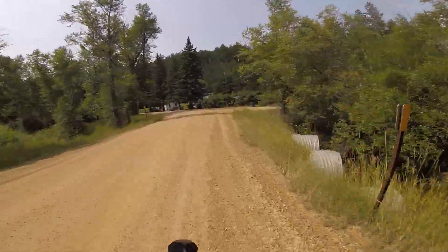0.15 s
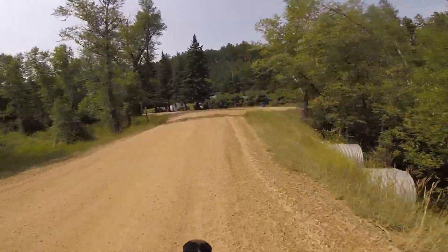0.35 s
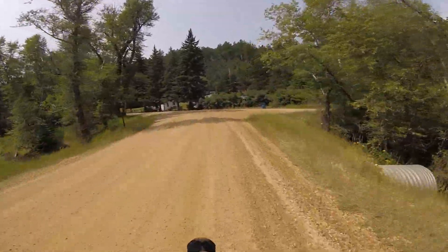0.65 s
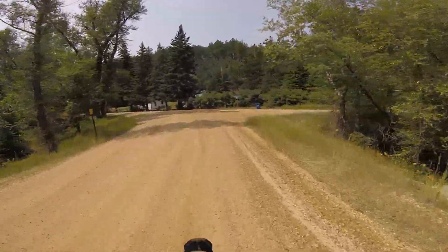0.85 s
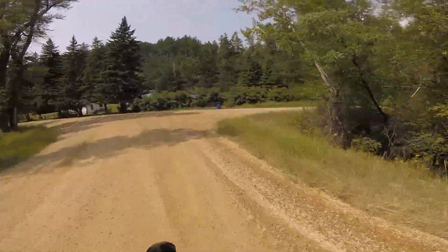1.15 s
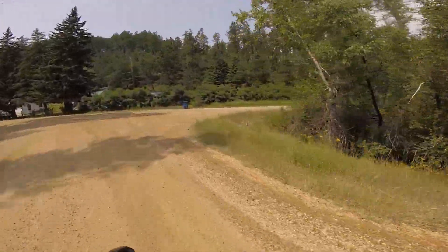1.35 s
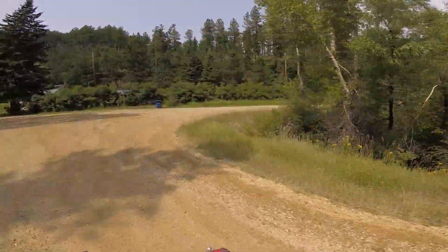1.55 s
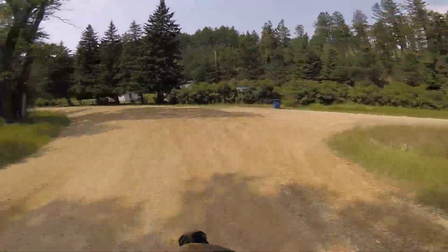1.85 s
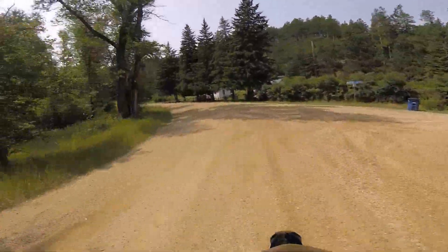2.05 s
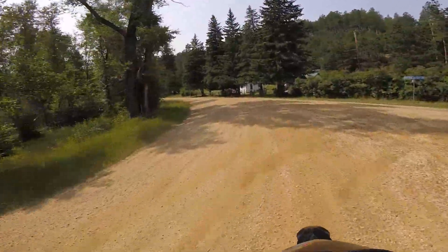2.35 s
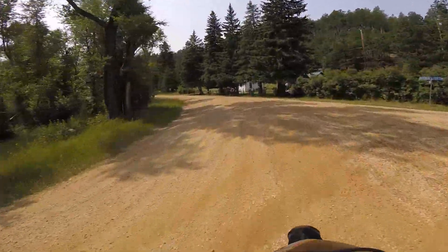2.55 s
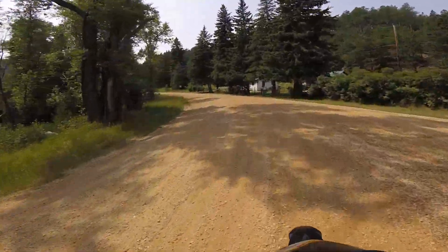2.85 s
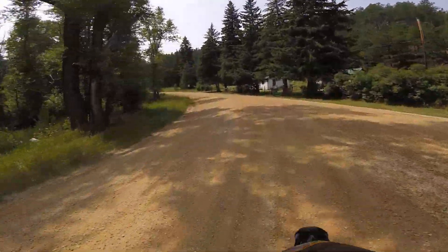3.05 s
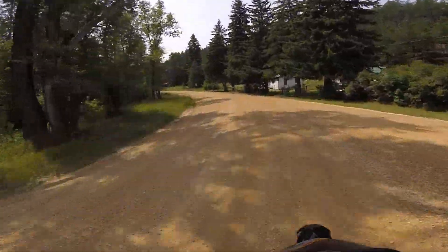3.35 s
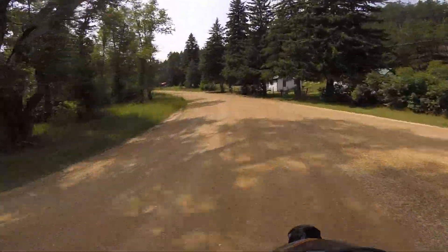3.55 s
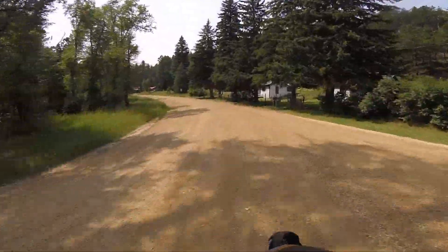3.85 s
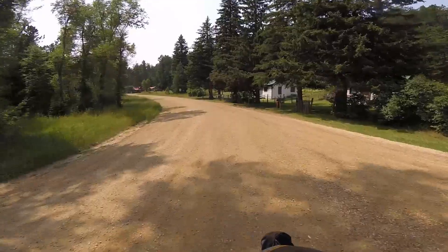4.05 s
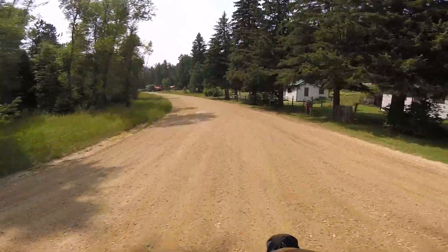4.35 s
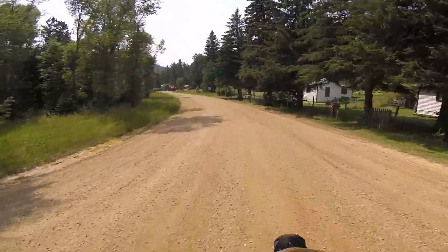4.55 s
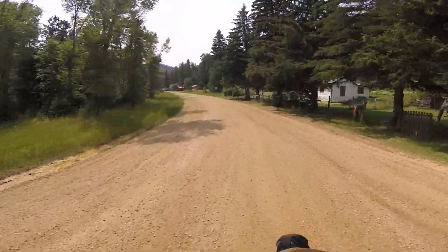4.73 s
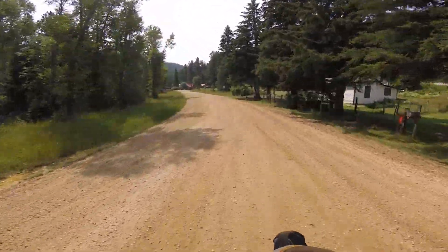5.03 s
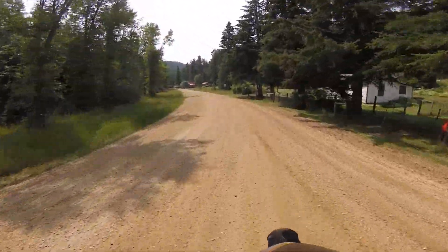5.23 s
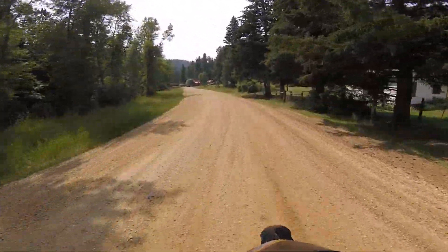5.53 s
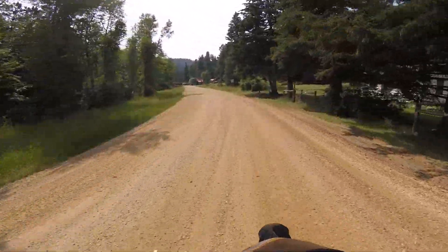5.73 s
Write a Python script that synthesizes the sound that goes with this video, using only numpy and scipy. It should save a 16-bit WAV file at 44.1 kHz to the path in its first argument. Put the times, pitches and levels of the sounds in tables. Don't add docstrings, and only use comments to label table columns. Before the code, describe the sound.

A single-cylinder motorcycle lurches and clatters, coasts sputtering into a gravel bend, then settles into a steady, low thudding pull away.

```python
import sys
import numpy as np
from scipy import signal
from scipy.fft import rfft, irfft, next_fast_len
from scipy.io import wavfile
from scipy.ndimage import uniform_filter1d, minimum_filter1d, map_coordinates

SR = 44100
rng = np.random.default_rng(int(sys.argv[2]) if len(sys.argv) > 2 else 0)


def transcribe(u):
    v = np.clip(np.atleast_2d(u).T, -1, 1)
    q = np.round(v * 32767).astype(np.int16)
    wavfile.write(sys.argv[1], SR, q)


def invert_db(level):
    return 10 ** (np.asarray(level, dtype=float) / 20)


N = 259742


def unit(x):
    return x / np.sqrt(np.mean(x ** 2) + 1e-20)


def curves(rows, s):
    t, *columns = np.transpose(rows)
    return [np.interp(s, t, column) for column in columns]


def clock():
    return np.arange(N) / SR


def wobble(rate):
    knots = rng.standard_normal(int(N * rate / SR) + 4)
    return map_coordinates(knots, [np.arange(N) * rate / SR])


def coloured(x, spectrum):
    size = next_fast_len(N + 8192)
    hz, db = np.transpose(spectrum)
    gain = invert_db(np.interp(np.log(np.fft.rfftfreq(size, 1 / SR) + 1), np.log(hz), db))
    return unit(irfft(rfft(x, size) * gain, size)[:N])


def coloured_noise(spectrum):
    return coloured(rng.standard_normal(N), spectrum)


def ringing(starts, sizes, modes, rise, scatter_db, detune, warm=1):
    lead, length = SR // 10, SR // 6
    t = np.arange(length) / SR
    rows = np.zeros((len(starts), length))
    for hz, db, fade_s, polarity in modes:
        chance = rng.standard_normal((len(starts), 2))
        pitch = hz * np.reshape(warm, (-1, 1)) * (1 + detune * chance[:, :1])
        level = invert_db(db + scatter_db * chance[:, 1:] - 60 * t / fade_s)
        rows += np.sign(polarity) * level * np.sin(2 * np.pi * pitch * t)
    soft_start = 1 - np.exp(-t / rise)
    soft_end = np.cos(np.pi / 2 * t / t[-1]) ** .5
    rows *= sizes[:, None] * soft_start * soft_end
    at = np.round(starts * SR).astype(int)[:, None] + lead + np.arange(length)
    return np.bincount(at.ravel(), rows.ravel(), N + SR)[lead:lead + N]


# time_s, rate_hz (firings per second)
ENGINE_SPEED = [(0.0, 28.349), (0.12, 24.125), (0.26, 24.709), (0.38, 17.397), (0.54, 30.748),
                (0.75, 30.837), (1.13, 29.66), (1.38, 28.482), (1.98, 26.511), (2.13, 27.092),
                (2.35, 25.916), (2.68, 25.271), (2.98, 25.822), (3.21, 25.136), (4.24, 26.814),
                (4.51, 26.894), (5.52, 28.336), (5.89, 29.635)]
FIRST_S, CRUISE_HZ = .019, 25.26


def crank():
    turns = np.cumsum(curves(ENGINE_SPEED, clock())[0]) / SR
    return turns - turns[round(FIRST_S * SR)]


# time_s, load_share (0-1), blow_db, unburnt_share (0-1)
THROTTLE = [(0, 1, 7.5, 1), (.2, 0.3, -5, 0.41), (.41, 0.2, -5, 0.14), (.44, 0.8, -7.5, 0.8),
            (.49, 0.7, 1, 0.13), (.53, 0.1, 4, 0.2), (.56, 0.91, 0.5, 1), (.585, 0.11, 0, 0.4),
            (1.1, 0, -2, 0.1), (1.5, 0.17, -4, 0.58), (1.75, 0.15, -3, 0.5), (1.9, 0.3, -5.5, 0.3),
            (2.05, 0.1, -6, 0.4), (2.2, 0.28, -6.5, 0.5), (2.4, 0.9, -5.5, 0.5), (2.6, 0.95, -4.5, 0.19),
            (2.9, 1, -5.5, 0.1), (3.2, 0.68, -3, 0.38), (4, 1, -5.9, 0.06), (5.89, 0.84, -3.5, 0.16)]
# start_s, level_db
MISFIRES = [(-.016, -11), (.135, -7.5), (.175, -5), (.256, -16), (.3, -11), (.348, -6.5), (.398, -9.5),
            (.558, -5), (.754, -13.5), (.885, -3.5), (.917, -8.5), (1.016, -9), (1.151, -5), (1.287, -7.5),
            (1.322, -5.5), (1.428, -9), (1.5, -12), (1.534, -11), (1.253, -3), (1.606, -4), (1.641, -3),
            (1.679, -5), (1.715, -4.5), (1.787, 1), (1.862, -7), (1.9, -0.5), (2.087, 1.5), (2.124, 3),
            (2.389, -2), (2.742, -3), (1.824, -6.5), (1.937, -11), (1.974, -7), (2.012, -6), (2.236, -8),
            (2.274, -6), (2.43, -4.5), (2.506, -4.5)]
# start_s, early_s (negative is late)
STUMBLES = [
    (.398, .007),
    (.451, 0.0073),
    (.214, .003),
    (2.012, .002),
    (2.161, .001),
    (2.35, -.0016),
    (3.093, .0014),
    (3.132, .0005),
    (3.172, -.001),
]
# start_s, early_s
CATCHES = [(1.017, 0.005), (1.288, 0.00054), (1.499, .003), (1.606, 0.01), (1.679, .0025), (1.788, 0.0014),
           (1.862, 0.00043), (1.9, .0036), (2.087, 0.0037), (2.312, 0.00035), (2.389, 0.00058),
           (2.467, 0.0014)]


def firings(turns):
    fired = np.interp(np.arange(turns[-1]), turns, clock())
    fired = np.r_[FIRST_S - 1 / ENGINE_SPEED[0][1], fired]
    for s, early in STUMBLES:
        fired[np.argmin(abs(fired - s))] -= early
    load, blow_db, unburnt = curves(THROTTLE, fired)
    load = np.clip(load, 0, 1)
    hot = load.copy()
    for s, early in CATCHES:
        k = np.argmin(abs(fired - s))
        fired[k], hot[k] = fired[k] - early, .95
    revs = curves(ENGINE_SPEED, fired)[0] - CRUISE_HZ
    ragged_s = .00012 + .0012 * unburnt ** 2
    fired = fired + ragged_s * rng.standard_normal(len(fired))
    burn = np.ones(len(fired))
    for s, db in MISFIRES:
        burn[np.argmin(abs(fired - s))] = invert_db(db)
    return fired, load, hot, invert_db(blow_db) * burn, burn, unburnt, revs


# pitch_hz, level_db, fade_s (to -60 dB), polarity
COAST = [(88.8, -10.5, 0.079, 1), (113.3, -22.5, 0.4, 1), (219, -9, 0.024, -1), (282.4, -9.5, 0.14, 1),
         (437, -27.5, 0.024, 1)]
# pitch_hz, level_db, fade_s, polarity
PULL = [(210, -7, 0.016, 1), (306.4, -10.5, 0.12, -1), (373, -34.5, 0.11, 1)]
# pitch_hz, level_db, fade_s, polarity
TAIL = [(166.6, -13, 0.1, 1)]
# pitch_hz, level_db, fade_s, polarity
HEADER = [(488, -20.5, 0.075, 1), (598, -29, 0.08, 1)]
# pitch_hz, level_db, fade_s, polarity
SNAP = [(196, -21, .03, -1)]
FULL_RING_S = .6


def pipes(fired, hot, blow, revs):
    heating = .0063 * revs
    tail_gain = invert_db(-8 * (fired < FULL_RING_S))
    header_gain = invert_db(.6 * np.maximum(revs, 0))
    pulling = blow * hot
    shut = ringing(fired - .0037, blow * (1 - hot), COAST, rise=.005, scatter_db=1.2, detune=.01,
                   warm=.98 + heating)
    pull = ringing(fired - .0009, pulling, PULL, rise=.0004, scatter_db=.6, detune=.004, warm=1 + heating)
    tail = ringing(fired - .0009, pulling * tail_gain, TAIL, rise=.0004, scatter_db=.6, detune=.004,
                   warm=1 + heating)
    header = ringing(fired - .0019, pulling * header_gain, HEADER, rise=.0006, scatter_db=.6, detune=.003,
                     warm=1 + heating)
    snap = ringing(fired - .002, pulling, SNAP, rise=.0005, scatter_db=.6, detune=.01)
    return shut + pull + tail + header + snap


# pitch_hz, level_db, fade_s, polarity
BOOM = [(88.44, -14.5, 0.18, -1)]
# time_s, level_db, late_s
LABOUR = [(0, -13, .005), (.12, -8.5, .005), (.2, -30.5, .002), (1.95, -30.5, 1.5), (2.05, -21, 0),
          (2.2, -21, .002), (2.3, -8, .0045), (2.5, -14, .005), (2.8, -13.5, .005), (3.05, -23.5, .005),
          (4.2, -20.5, .005), (5.89, -35, .004)]
# pitch_hz, level_db, fade_s, polarity
SURGE = [(79, 0.5, 0.12, 1)]


def silencer_box(fired, load, blow, burn, revs):
    boom_db = 4.5 - 1.5 * np.maximum(revs, 0)
    boom = ringing(fired - .0025, invert_db(boom_db) * blow * load, BOOM, rise=.0025, scatter_db=.9, detune=.012)
    surge_db, late = curves(LABOUR, fired)
    surge_size = invert_db(surge_db) * np.minimum(burn, 1) ** .5
    surge = ringing(fired - .0035 + late, surge_size, SURGE, rise=.012, scatter_db=1.5, detune=.015)
    return boom + surge


# pitch_hz, level_db, fade_s, polarity
AIRBOX = [(50, -26.5, 0.24, -1)]
# pitch_hz, level_db, fade_s, polarity
PLATE = [(187.4, -10, 0.12, 1), (449, -33.5, 0.015, 1)]


def intake(fired, load, revs):
    airbox_size = invert_db(2.5 * np.maximum(revs, 0)) * load ** 1.4
    airbox = ringing(fired - .0025, airbox_size, AIRBOX, rise=.0025, scatter_db=.9, detune=.012)
    half_open = load * (1 - load) * (fired > FULL_RING_S)
    return airbox + ringing(fired - .002, half_open, PLATE, rise=.003, scatter_db=3, detune=.04)


# pitch_hz, level_db, fade_s, polarity
PUFF = [(78.1, -8.5, 0.13, 1), (97, -11, 0.042, 1), (201, -30.5, 0.021, 1), (276, -15.5, 0.044, -1)]


def unburnt_puff(fired, load, hot, burn, unburnt, revs):
    burnt = np.minimum(burn, 1) * (1 - np.clip(unburnt, 0, 1))
    pumped = np.maximum(1 - burnt, hot - load)
    late = .0006 * rng.standard_normal(len(fired))
    puff_db = 2 - 3 * load - 1.3 * np.maximum(revs, 0)
    sag = 1 + .017 * np.minimum(revs, 0)
    return ringing(fired - .0035 + late, invert_db(puff_db) * pumped, PUFF, rise=.0065, scatter_db=.7,
                   detune=.015, warm=sag)


def exhaust(turns):
    fired, load, hot, blow, burn, unburnt, revs = firings(turns)
    gas = pipes(fired, hot, blow, revs) + silencer_box(fired, load, blow, burn, revs)
    gas = gas + intake(fired, load, revs) + unburnt_puff(fired, load, hot, burn, unburnt, revs)
    packing = signal.butter(3, 640, fs=SR, output="sos")
    return signal.sosfilt(packing, gas, zi=signal.sosfilt_zi(packing) * gas[0])[0]


# pitch_hz, level_db
CLATTER = [(250, -49.5), (400, 5), (600, 1), (800, 0), (1050, -0.5), (1500, -11), (2000, -24),
           (2550, -27.5), (3200, -26), (5000, -29.5), (11000, -56)]


def clatter(turns, level_db):
    def swell(share, width):
        return np.exp((np.cos(2 * np.pi * (turns + share)) - 1) / width)

    load = np.clip(curves(THROTTLE, clock())[0], 0, 1)
    gate = .6 + (.25 + .6 * load) * swell(.15, .6) + (.4 - .2 * load) * swell(.72, .3)
    uneven = invert_db(.3 * wobble(30) + .83 * wobble(6.7))
    return invert_db(level_db + 4.5) * unit(uneven * gate * coloured_noise(CLATTER))


# pitch_hz, level_db
PANEL = [(1300, -53), (1495, 1.5), (1515, 0.5), (1535, -1), (1700, -42), (1835, -11), (1852, -0.5),
         (1900, -51.5)]


def panel():
    slack = np.minimum(curves(ENGINE_SPEED, clock())[0] - 29.5, 0)
    shut = np.clip(1 - curves(THROTTLE, clock())[0], 0, 1)
    return invert_db(-55.5 + 2.5 * slack) * shut * coloured_noise(PANEL)


# pitch_hz, level_db
RASP = [(200, -36), (330, 10), (450, 2.5), (680, 0.5), (900, -13), (1500, -57.5)]


def rasp(turns):
    load, _, unburnt = np.clip(curves(THROTTLE, clock()), 0, 1)
    gate = 2.8 + np.exp((np.cos(2 * np.pi * (turns - .15)) - 1) / .5)
    noise = unit(gate * invert_db(1.5 * wobble(25)) * coloured_noise(RASP))
    return invert_db(-37 - 7 * load) * np.sqrt(unburnt) * noise


# pitch_hz, width_hz, level_db, swing_db
FRAME = [
    (1852, 25, -73, 2.5),
    (2520, 120, -67, 1.5),
    (4700, 600, -70, 1.5),
]


def frame():
    total = np.zeros(N)
    for hz, width, db, swing_db in FRAME:
        band = [(hz - 3 * width, -60), (hz - width / 2, 0), (hz + width / 2, 0), (hz + 3 * width, -60)]
        total += invert_db(db + swing_db * wobble(7.4)) * coloured_noise(band)
    return total


# pitch_hz, level_db
HISS = [(500, -20.5), (1000, 7.5), (2000, 2), (3000, -2), (5000, -15), (5700, -19), (7000, -14.5),
        (9800, -32), (10700, -28.5), (11500, -49.5), (14000, -75)]


def tyres(level_db):
    spikes = (rng.random(N) < .01) * invert_db(3 * rng.standard_normal(N)) * rng.choice([-1, 1], N)
    bed = rng.standard_normal(N) * invert_db(.35 * wobble(11) + 2 * wobble(2.6))
    return invert_db(level_db + 7) * coloured(bed + .35 * unit(spikes), HISS)


# time_s, level_db
WIND = [
    (0, -32),
    (.6, -34),
    (1.1, -35),
    (1.5, -32),
    (4.1, -32),
    (4.7, -37),
    (5.89, -39),
]
# pitch_hz, level_db
BUFFET = [(15, -30), (30, -8), (60, 0), (100, -3), (200, -14), (350, -28), (700, -48), (2000, -90)]


def wind():
    level_db, = curves(WIND, clock())
    return invert_db(level_db) * unit(invert_db(1.1 * wobble(16)) * coloured_noise(BUFFET))


def knocks(hits, fade_s, below, above):
    out, t = np.zeros(N + SR), np.arange(SR // 20) / SR
    for s, db, hz in hits:
        burst = invert_db(-60 * t / fade_s) * (1 - np.exp(-t / .001)) * rng.standard_normal(len(t))
        band = signal.butter(3, [below * hz, above * hz], "bandpass", fs=SR, output="sos")
        hit = signal.sosfilt(band, burst)
        out[round(s * SR):][:len(t)] += invert_db(db) * hit / abs(hit).max()
    return out[:N]


# start_s, level_db (peak), pitch_hz
GRIT = [
    (.035, -38, 6500),
    (.084, -42.5, 7000),
    (.17, -48.5, 6000),
    (.275, -45, 4170),
    (.283, -47, 4160),
    (.352, -49.5, 7040),
    (.492, -42, 4530),
    (.5, -45, 7000),
]
# start_s, level_db (peak), pitch_hz
KNOCKS = [(.052, -27.5, 1700), (.168, -28, 1210), (.176, -33, 890), (.415, -33.5, 1210), (.444, -31, 1320),
          (.484, -24.5, 593), (.491, -25, 1100), (.497, -28, 590), (.523, -22, 786), (.526, -28, 1790),
          (.533, -25, 600), (.488, -32, 2220), (.563, -26, 910), (.619, -47, 950), (.679, -26, 900),
          (1.49, -30.5, 990), (2.232, -27.5, 1190), (2.233, -29, 520), (2.395, -25.5, 1034),
          (2.459, -33, 1500), (2.467, -30, 1310), (2.732, -32, 800), (2.885, -38, 870), (3.001, -46.5, 920),
          (3.513, -38.5, 830), (3.595, -38, 890), (3.982, -36, 980), (5.592, -46, 806), (5.612, -28, 820),
          (5.657, -30, 905), (.289, -45, 1070), (.754, -40, 1080), (2.338, -37, 1040), (2.647, -34, 850),
          (3.159, -30.5, 1033), (3.552, -30, 845), (3.897, -39, 1070), (4.423, -39, 890),
          (4.608, -36, 1040), (4.792, -50.5, 1060), (5.083, -34.5, 1080), (5.191, -35.5, 1090),
          (5.546, -39, 1000), (5.692, -40, 1080)]


def flying_stones():
    return knocks(GRIT, .014, .77, 1.2) + knocks(KNOCKS, .026, .45, 1.37)


# start_s, level_db (peak), pitch_hz
THUDS = [
    (.08, -34.5, 1000),
    (.19, -36, 650),
    (.444, -34, 550),
    (.486, -28, 610),
    (.505, -38, 800),
    (.522, -24, 650),
    (.545, -36, 690),
    (2.231, -26.5, 554),
    (2.395, -30.5, 700),
    (2.466, -33, 700),
]


def driveline():
    return knocks(THUDS, .08, .65, 1.6)


# time_s, level_db
GRAVEL = [(0, -42), (.15, -52.5), (.36, -57.5), (.5, -52.5), (.75, -57.5), (1.4, -59), (2.2, -60),
          (2.5, -59.5), (3.3, -61), (3.75, -62.5), (4.7, -58.5), (5.89, -57.5)]


def scene():
    turns = crank()
    loose_db, = curves(GRAVEL, clock())
    throttle = curves(THROTTLE, clock())[0]
    clatter_db = -49 + .52 * (loose_db - loose_db.mean()) + 2 * (throttle - .5)
    bike = exhaust(turns) + clatter(turns, clatter_db) + panel() + rasp(turns) + frame()
    road = tyres(loose_db)
    return (bike + road + wind() + flying_stones() + driveline())[None]


def roll_off(x):
    return signal.sosfilt(signal.butter(12, 13000, fs=SR, output="sos"), x)


def record(dry):
    bass_cut = signal.butter(2, 25, "highpass", fs=SR, output="sos")
    dry = signal.sosfiltfilt(bass_cut, dry, padtype="even")
    ceiling, span = .272, round(.012 * SR)
    cut_db = 20 * np.log10(np.maximum(1, abs(dry) / ceiling))
    release_db = 77.5 * np.arange(N) / SR
    need = invert_db(release_db - np.maximum.accumulate(cut_db + release_db, axis=1).clip(release_db))
    held = minimum_filter1d(need, 2 * span + 1)
    gain = uniform_filter1d(uniform_filter1d(held, span), span)
    return roll_off(dry * gain)


dry = scene()
out = record(dry)
transcribe(out)
```